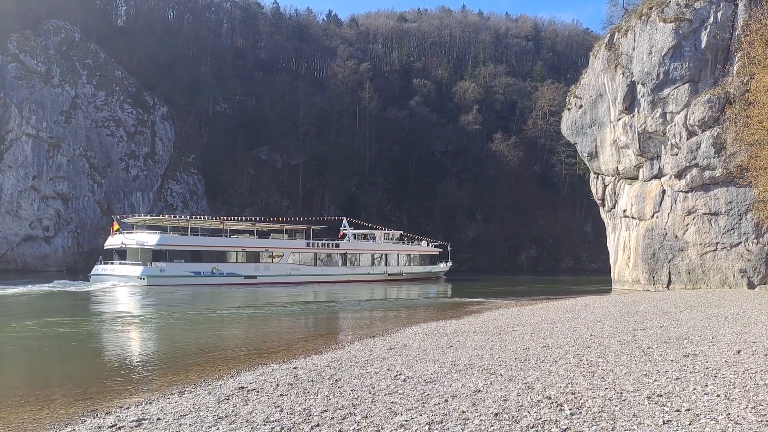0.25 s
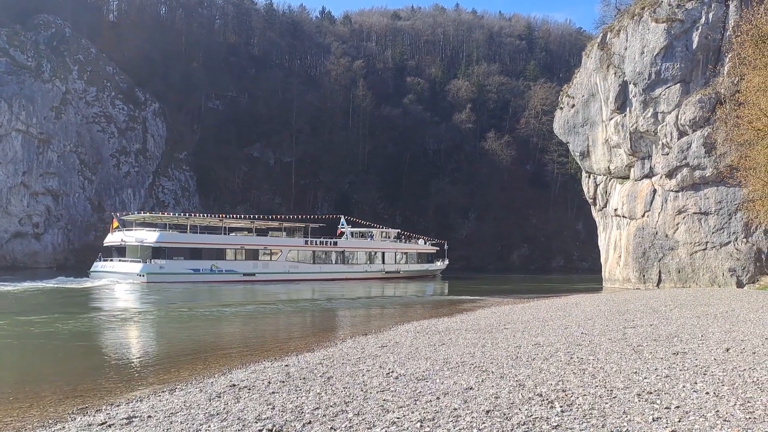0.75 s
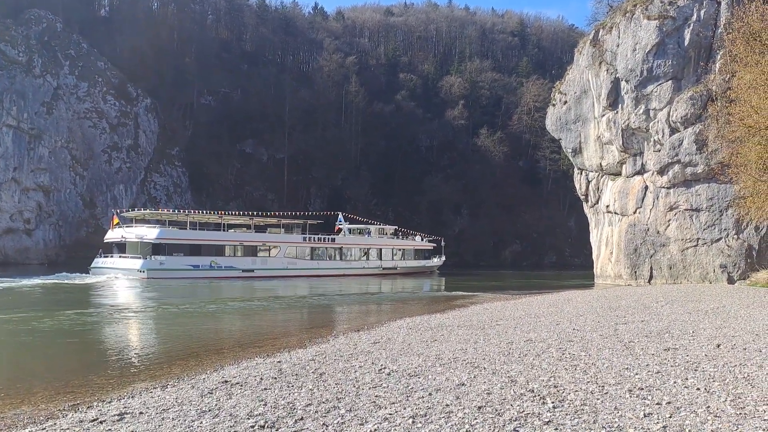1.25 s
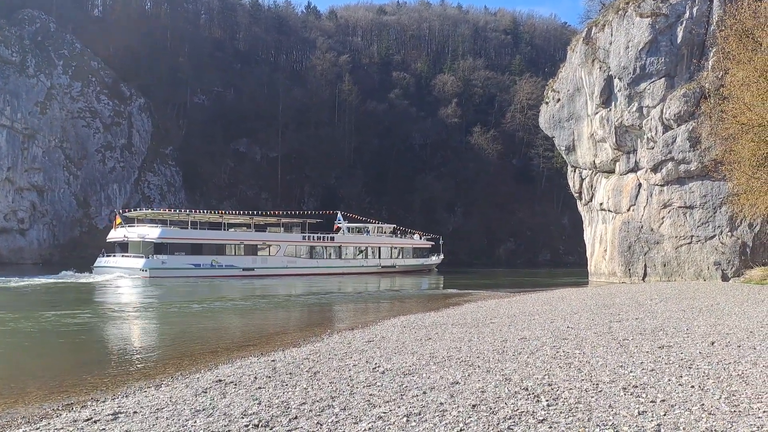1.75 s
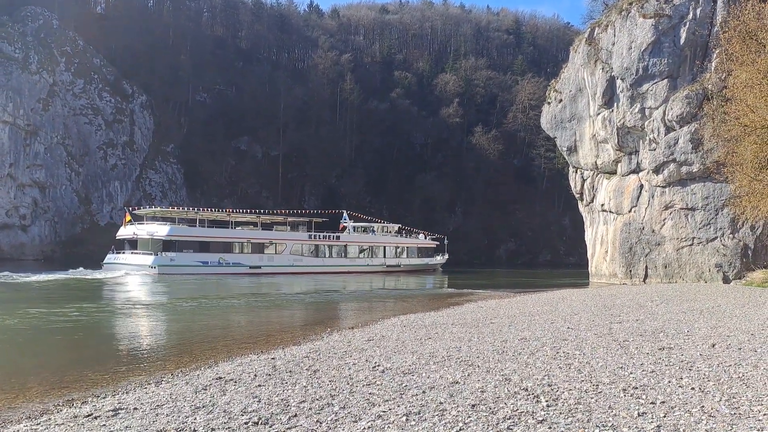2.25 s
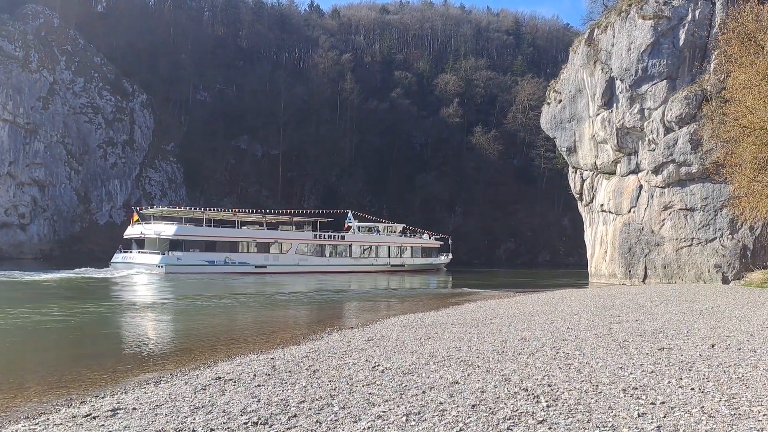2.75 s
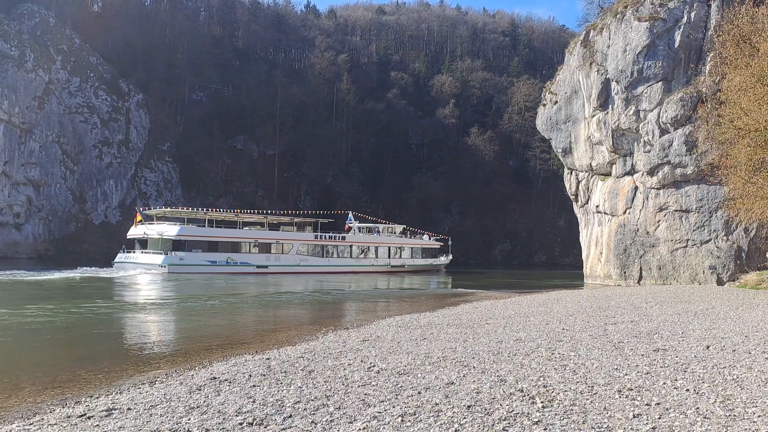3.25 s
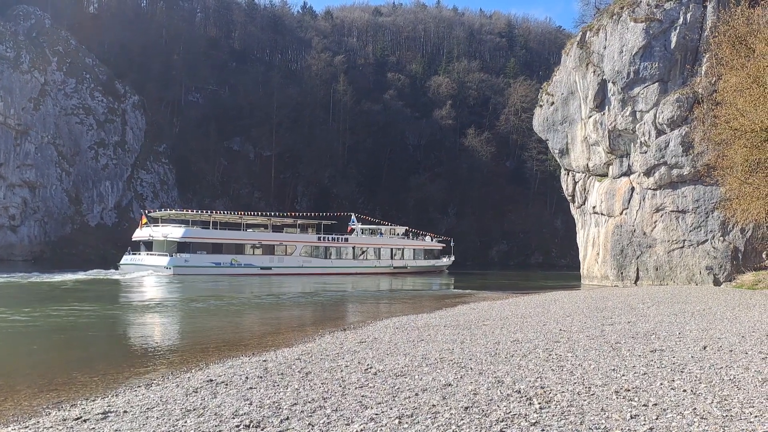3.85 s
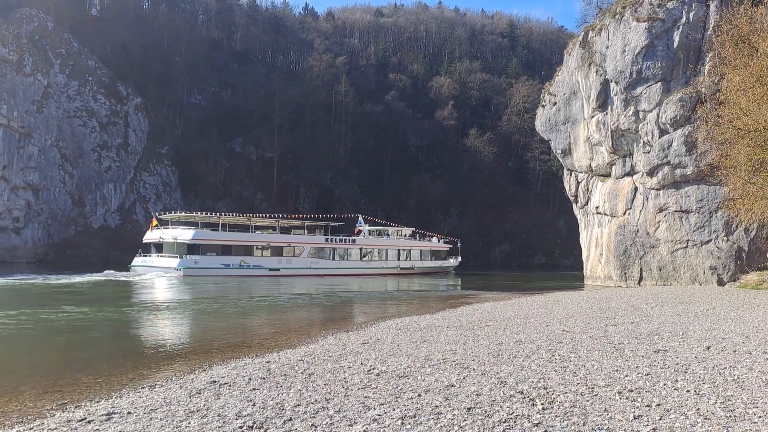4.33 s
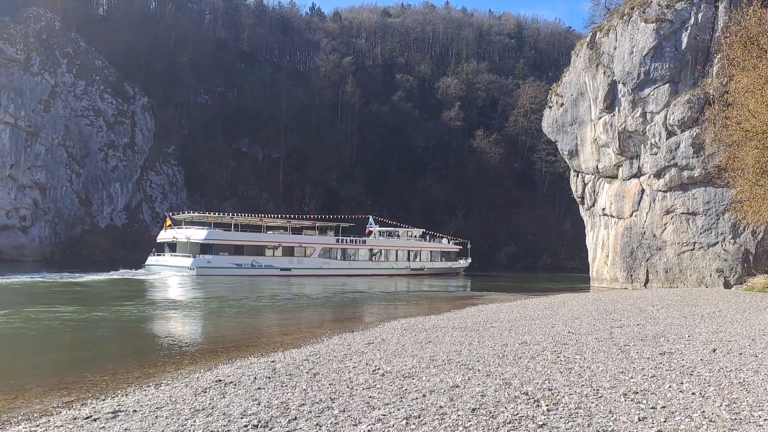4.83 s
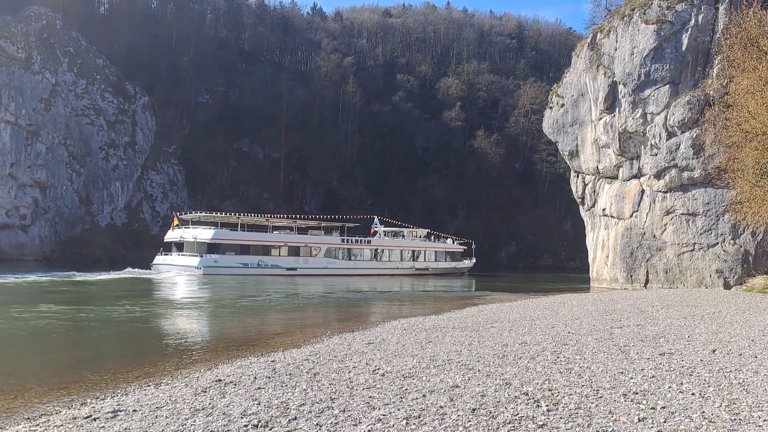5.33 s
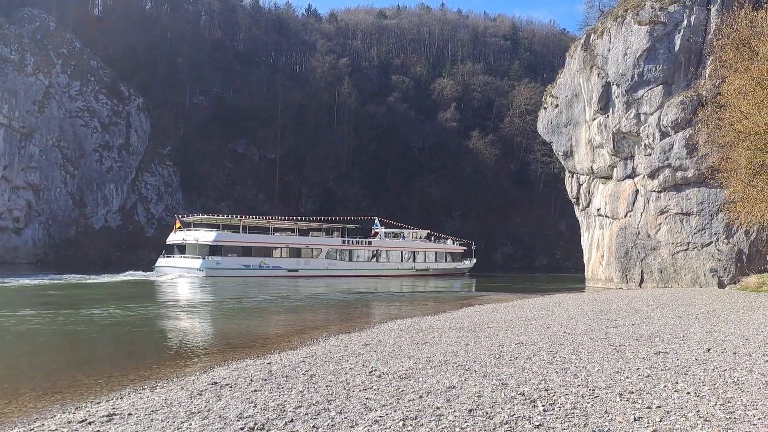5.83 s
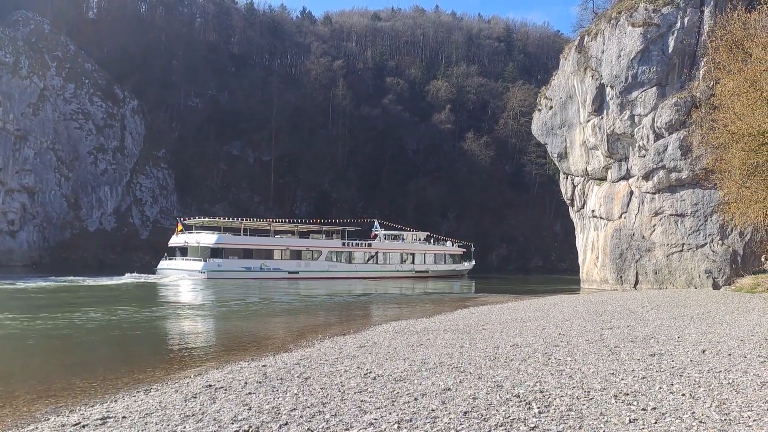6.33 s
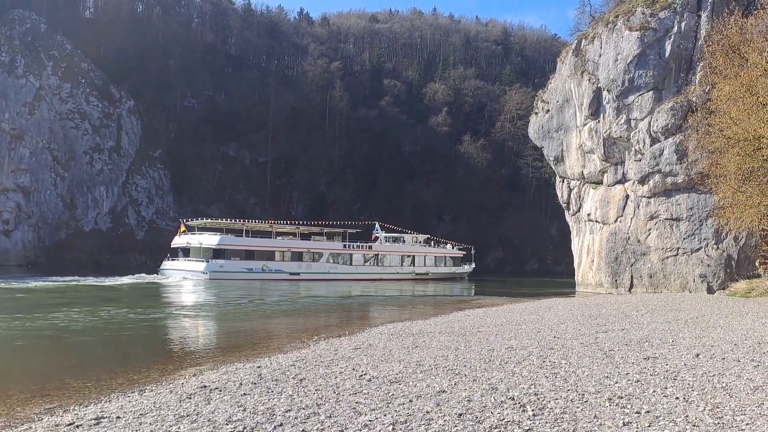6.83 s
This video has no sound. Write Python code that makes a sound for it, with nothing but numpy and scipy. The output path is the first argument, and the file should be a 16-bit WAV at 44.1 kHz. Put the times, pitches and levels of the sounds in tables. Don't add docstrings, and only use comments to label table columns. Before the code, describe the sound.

Outdoors on a gravel river bank in a gorge, a large passenger boat moves off with a deep, steady diesel throb that beats and swells, under a broad watery wash of wake and exhaust. Close by, wavelets hiss over pebbles with tiny ticks and drops, thickest in the first second. Small birds whistle thinly and buzz in the woods, echoing briefly, while light wind bumps the phone microphone.

```python
import sys
import numpy as np
from scipy import signal
from scipy.fft import rfft, irfft, next_fast_len
from scipy.io import wavfile
from scipy.ndimage import uniform_filter1d

SR = 44100
rng = np.random.default_rng(int(sys.argv[2]) if len(sys.argv) > 2 else 0)


def store_pcm(level_fs):
    pcm = np.round(np.clip(level_fs, -1, 1) * 32767).astype(np.int16)
    wavfile.write(sys.argv[1], SR, np.atleast_2d(pcm).T)


def field_ratio(decibels):
    return 10 ** (np.asarray(decibels, dtype=float) / 20)


N = 312159
TIME = np.arange(N) / SR
SIZE = next_fast_len(N)
HZ = np.arange(SIZE // 2 + 1) * SR / SIZE + 1e-9
PORT_LAG = 8


def curves(table):
    s, *columns = np.transpose(table)
    return [np.interp(TIME, s, c) for c in columns]


def over_hz(table):
    hz, value = np.transpose(table)
    return np.interp(np.log(HZ), np.log(hz), value)


def unit(x):
    return x / np.sqrt(np.mean(x ** 2))


def walk(rate):
    k = int(SR / rate)
    held = np.repeat(rng.standard_normal(N // k + 1), k)
    return unit(uniform_filter1d(uniform_filter1d(held, k), k)[:N])


def band(x, lo_hz, hi_hz):
    sos = signal.butter(2, [lo_hz, min(hi_hz, .45 * SR)], "band", fs=SR, output="sos")
    return signal.sosfilt(sos, x)


def pan(db):
    return field_ratio(np.array([db, -db]) / 2).reshape(2, -1)


def hump(length, power):
    count = int(length * SR)
    return np.sin(np.pi * np.arange(count) / count) ** power


def add(out, s, piece):
    i = int(s * SR)
    out[..., i:i + piece.shape[-1]] += piece[..., :N - i]


def tone(turns, db, wander):
    return np.sqrt(2) * field_ratio(db) * np.sin(2 * np.pi * turns + wander * walk(7.6))


# time in seconds, level in dB.
MAINS_LEVEL = [(0.0, -33.5), (0.5, -45), (1.0, -37), (1.5, -31.5), (2.0, -32.5), (2.5, -34), (3.0, -39),
               (3.5, -33), (4.0, -30), (4.5, -27.5), (5.0, -28), (5.5, -30.5), (6.0, -31), (6.5, -28),
               (7.0, -26.5)]
# time in seconds, rate in Hz.
MAINS_RATE = [(0, 55.5), (.7, 55.73), (3.0, 55.7), (3.5, 55.7), (4.0, 55.97), (4.9, 56.02), (5.5, 55.85),
              (7.08, 55.82)]
# pitch in Hz, turns made at the start.
UPPER_ORDERS = [(112.56, .49), (111.88, .32), (111.6, .81), (112.39, .35), (167.87, .94), (167.53, .54),
                (167.3, .85), (167.16, .78)]
UPPER_LEVELS = (-47, -54.5, -55, -59, -54.5, -54.5, -66, -59.5)


def mains():
    turns = .07 + np.cumsum(curves(MAINS_RATE)[0]) / SR
    out = tone(turns, curves(MAINS_LEVEL)[0] + 1, .05)
    for (hz, start), db in zip(UPPER_ORDERS, UPPER_LEVELS):
        out += tone(start + hz * TIME, db + walk(8.3), 0.095)
    return out


# time in seconds, level in dB.
GENERATOR_LEVEL = [(0, -32), (1, -30), (2, -31), (3, -32.5), (4, -31.5), (5, -34), (6, -32), (7.08, -31.5)]
# multiple of the firing rate, level against the firing line in dB.
GENERATOR_MULTIPLES = [(7 / 6, -19), (1.25, -26.5), (11 / 6, -27), (2, -28.5), (3, -28)]


def generator():
    turns = .2 + 75.025 * TIME
    db = curves(GENERATOR_LEVEL)[0] + .5 * walk(9)
    out = tone(turns, db, .05)
    for multiple, under_db in GENERATOR_MULTIPLES:
        out += tone(multiple * turns, db + under_db, 0.22)
    return out


# start in seconds, length in seconds, start pitch in Hz,
# end pitch in Hz, level in dB.
HULL_BOOMS = [
    (0.659, 0.22, 218, 235, -43.5),
    (2.853, 0.12, 239, 248, -51.5),
    (3.479, 0.11, 212.6, 225, -42),
    (3.979, 0.17, 212.5, 207, -43.5),
    (5.302, 0.12, 202, 253, -42),
    (5.407, 0.097, 270, 290, -44),
    (5.548, 0.14, 227.6, 223, -49),
    (6.051, .009, 630, 755, -40),
]


def hull():
    out = np.zeros(N)
    for s, length, start_hz, end_hz, db in HULL_BOOMS:
        shape = hump(length, 0.83)
        turns = np.cumsum(np.linspace(start_hz, end_hz, len(shape))) / SR
        add(out, s, field_ratio(db) * np.sqrt(2) * shape * np.sin(2 * np.pi * turns))
    return out


def engines():
    out = mains() + generator() + hull()
    return np.array([out, np.pad(out, (PORT_LAG, 0), "edge")[:N]])


# frequency in Hz, left minus right in dB.
PORT_BALANCE = [(60, -16.5), (110, 2), (200, -1), (380, 0.5), (700, -0.5), (1290, -0.5), (2380, -3.5),
                (4400, 1.5), (8120, 7), (15000, 10.5)]


def rush(colour, alike, lead, flicker_db, rate):
    shared, left, right = rfft(rng.standard_normal((3, SIZE)))
    alike = np.clip(alike, 0, 1)
    pair = np.sqrt(alike) * np.array([shared, shared * np.exp(-1j * lead)])
    pair = pair + np.sqrt(1 - alike) * np.array([left, right])
    pair = pair * field_ratio(over_hz(colour)) * pan(over_hz(PORT_BALANCE))
    centres = 62.5 * 2. ** np.arange(9)
    place = np.log2(np.clip(HZ, centres[0], centres[-1]))
    out = np.zeros((2, N))
    for c in centres:
        if colour[0][0] / 2 < c < colour[-1][0] * 2:
            octave = np.clip(1 - abs(place - np.log2(c)), 0, 1)
            out += field_ratio(flicker_db * walk(rate)) * irfft(pair * octave, SIZE)[:, :N]
    return unit(out)


def bubbles(rate, cycles):
    out = np.zeros((2, N))
    for hz in 420 * 1.17 ** np.arange(12):
        pushes = (rng.random(N) < rate / SR) * field_ratio(4.4 * np.minimum(rng.exponential(size=N), 3.0))
        pushes = uniform_filter1d(pushes, size=int(SR / hz / 2))
        pole = np.exp(-hz / cycles / SR)
        ring = signal.lfilter([1], [1, -2 * pole * np.cos(2 * np.pi * hz / SR), pole ** 2], pushes)
        out += pan(3.1 * rng.standard_normal()) * unit(ring) * (600 / hz) ** 0.26
    return unit(np.array([out[0], np.pad(out[1], (PORT_LAG, 0))[:N]]))


# start in seconds, length in seconds, rise in dB.
RUN_UPS = [(0, 0.33, 1.5), (0.54, 0.57, 7), (0.899, 0.6, 3), (1.49, 0.27, 3), (2.42, .25, 1),
           (2.62, 0.26, 2), (3.41, 0.25, 3.5), (4.6, 0.58, 5.5), (4.978, 0.86, 6.5), (5.947, 0.13, 4.5),
           (6.4, .8, 3.5)]


def surge():
    out = np.zeros(N)
    for s, length, rise_db in RUN_UPS:
        progress = np.linspace(0, 1, int(length * SR)) ** 0.72
        add(out, s, rise_db * np.sin(np.pi * progress))
    return out


# frequency in Hz, level in dB
# per Hz.
WAKE_COLOUR = [(30, -13.5), (60, -3.5), (110, -3.5), (180, -5.5), (320, -10), (600, -8), (780, -11.5),
               (1000, -12.3), (1400, -14.5), (2000, -20.5), (2800, -22.5), (3700, -31), (5000, -33.5),
               (6100, -38.5), (7500, -39.5), (9500, -53)]
# frequency in Hz, likeness from 0 to 1.
WAKE_ALIKE = [(100, 0.97), (300, 0.94), (700, 0.82), (1200, 0.62), (2000, 0.64), (2800, 0.71), (3300, 0.6),
              (6000, 0.2), (7500, 0.96)]
# frequency in Hz, lead in radians.
WASH_LEAD = [(50, 0.045), (300, 0.065), (1000, 0.55), (1640, 1.68), (1900, 1.07), (2400, 1.9), (3200, 4.2),
             (3800, 4.92), (4600, 4.76), (5400, 5.7), (6000, 8.8), (7000, 11.7), (7600, 13.9)]
# frequency in Hz, level in dB per Hz.
SPRAY_SPECTRUM = [(1700, -27), (2200, -7), (2900, 3.5), (3400, 4.5), (3900, -0.5), (4400, -10), (5500, -54)]


def wash():
    lead = over_hz(WASH_LEAD)
    wake = rush(WAKE_COLOUR, over_hz(WAKE_ALIKE), lead, 1.3, 15)
    gurgle = field_ratio(-11) * bubbles(rate=18, cycles=9)
    wake_db = -41.5 + 4.0 - 0.226 * TIME + 0.14 * walk(7.5)
    spray_db = -53.5 - 1.83 * TIME + .72 * surge()
    spray = rush(SPRAY_SPECTRUM, 0.78, lead, 2.0, 12)
    return field_ratio(wake_db) * (wake + gurgle) + field_ratio(spray_db) * spray


CRACKLE_PITCHES = (6500, 8500, 10500, 12500, 14300)


def crackle(level):
    burst = rng.random(N) < 420 / SR * level / np.median(level)
    strength = field_ratio(2.8 * np.minimum(rng.exponential(size=N), 3))
    sparks = burst * strength * rng.choice([-1, 1], N)
    sides = pan(5 + 4 * rng.standard_normal(N))
    size = rng.integers(len(CRACKLE_PITCHES), size=N)
    out = np.zeros((2, N))
    for k, hz in enumerate(CRACKLE_PITCHES):
        out += band(sparks * sides * (size == k), hz * .88, hz * 1.12) * np.sqrt(9000 / hz)
    return unit(out)


# frequency in Hz, level in dB per Hz.
SEETHE_SPECTRUM = [(4500, -22), (6000, -6.5), (7500, 1), (9000, -3.5), (11000, -5.5), (13800, -8),
                   (15600, -19)]
# frequency in Hz, likeness from 0 to 1.
SEETHE_LIKENESS = [(6000, 0.4), (7500, 0.7), (10000, 1), (11500, 0.4), (13500, 0.6), (14500, .9)]
# time in seconds, side gain in dB.
BANK_SPREAD = [(0, -2), (.5, 0), (1, 1), (1.6, -3), (1.75, -7), (2.4, -4), (2.55, 3), (3.1, 0), (3.7, 1.5),
               (3.9, -3), (4.35, -5), (4.5, 3), (4.8, 4), (5.5, 1), (5.95, -2), (6.3, -6), (6.5, 1.5),
               (7.08, 0)]


def seethe():
    level = field_ratio(-68 - 0.74 * TIME + surge() + 1.2 * walk(14))
    hiss = rush(SEETHE_SPECTRUM, over_hz(SEETHE_LIKENESS), 0, 1.5, 25)
    left, right = level * (field_ratio(3.0) * hiss + field_ratio(-3) * crackle(level))
    mid = (left + right) / 2
    side = (left - right) / 2 * field_ratio(curves(BANK_SPREAD)[0])
    return np.array([mid + side, mid - side])


# time in seconds, peak in dB, pitch in Hz, left minus right in dB.
PEBBLE_TICKS = [(0.0498, -43, 13900, 3.0), (0.532, -50, 11900, 10), (0.5586, -45, 13300, 9),
                (0.615, -46, 10000, 3.5), (0.6739, -40, 11700, 8), (.7607, -46, 13800, 4),
                (0.8145, -45, 11400, 3.0), (0.855, -41, 11500, 8), (.9428, -46, 12900, 3),
                (1.1079, -49, 11500, 3.5), (2.3261, -53, 9950, 2.0), (2.5446, -45, 12200, 13),
                (2.5915, -45, 13800, 11), (2.8594, -50, 9440, 4.0), (2.9566, -48, 10900, 13),
                (3.3423, -53, 9960, 2.0), (3.485, -44, 8960, 8), (3.6576, -49, 13400, 9),
                (4.2093, -53, 11300, 2.0), (4.4608, -53, 11000, 11), (4.6019, -45, 9460, 10),
                (4.775, -48, 12400, 16), (5.0389, -52, 9870, 9.0), (5.5388, -50, 13500, 10),
                (5.9703, -49, 9800, 0.5), (6.1155, -49, 10300, 5), (6.138, -50, 11900, 8),
                (6.3804, -51, 9710, 5.0), (6.4622, -44, 15400, 10), (6.76, -49, 11000, 7)]


def pebbles():
    out = np.zeros((2, N))
    t = TIME[:int(.006 * SR)]
    for s, db, hz, pan_db in PEBBLE_TICKS:
        noise = rng.standard_normal(len(t))
        knock = .9 * band(noise, hz * .72, min(hz * 1.3, 15700))
        ring = np.exp(-t / .0007) * (.5 * np.sin(2 * np.pi * hz * t) + knock)
        body_db = -3 - 17 * np.log2(hz / 11000) + 4
        body = field_ratio(body_db) * np.exp(-t / .0009) * band(band(noise, 6600, 9300), 6600, 9300)
        add(out, s, field_ratio(db + 4.0) * pan(pan_db) * (ring + body))
    return out


def pings(table, cycles, gain_db):
    out = np.zeros((2, N))
    t = TIME[:int(.006 * SR)]
    for s, db, hz, pan_db in table:
        ring = np.exp(-t * hz / cycles) * np.sin(2 * np.pi * hz * t)
        add(out, s, field_ratio(db + gain_db) * pan(pan_db) * ring)
    return out


# time in seconds, peak in dB, #
# pitch in Hz, left minus right in dB.
RINGING_DROPS = [(0.6264, -47, 6840, 0.5), (0.7034, -46, 6050, 2.5), (0.7124, -43, 6700, 1.5),
                 (0.7264, -46, 6590, 2.0), (0.7514, -50, 8080, 0.5), (0.7622, -46, 8030, 2.0),
                 (0.815, -45, 8030, 1.5), (0.838, -44, 9290, 2.5), (0.8839, -45, 6420, 3.5),
                 (0.9004, -48, 7920, 2.0), (0.9742, -45, 8090, 2.0), (1.2104, -52, 7190, 3.0),
                 (2.1974, -44, 6900, 2.5), (4.6463, -54, 7460, 3.0), (5.0494, -51, 6970, 3.0),
                 (5.0674, -48, 7050, 3.0), (6.6114, -53, 6900, 5.5), (6.7034, -50, 7100, 4.0),
                 (6.8982, -52, 7300, 4.0), (6.9964, -57, 6940, 6.0),
                 (0.5851, -55, 10100, 5.0), (0.6913, -48, 10400, 3.0), (0.7208, -47, 11400, 3.5),
             (0.8294, -43, 11300, 4.5), (1.071, -50, 11300, 3.5), (1.1533, -53, 9780, 6.5),
             (2.2633, -59, 10100, 0.5), (2.3895, -57, 12100, 6.5), (2.6843, -50, 10200, 5.7),
             (3.2869, -55, 10800, 7.0), (3.4924, -51, 9800, 3.5), (3.6925, -48, 10000, 6.5),
             (4.1624, -57, 10100, 1.5), (4.8389, -56, 9700, 9.5), (4.8994, -51, 10700, 8.5),
             (4.9187, -55, 9870, 7.0), (5.0574, -50, 10300, 10.5), (5.1417, -54, 12400, 10.5),
             (5.5974, -57, 9720, 5.0), (6.7126, -53, 10600, 3.0), (6.9092, -55, 10800, 3.5),
                 (0.0328, -52, 13800, 3.0), (0.5197, -53, 14100, 4.0), (0.7243, -50, 13400, 3.5),
              (0.8884, -50, 12900, 2.5), (0.9617, -51, 13000, 2.0), (0.9921, -45, 13000, 4.0),
              (1.3982, -57.5, 13800, 0.5), (2.0502, -56, 13000, 6.0), (2.1959, -60, 12500, 2.0),
              (2.4179, -58, 14400, 1.0), (2.8963, -56, 13000, 8.5), (3.4146, -57, 13600, 3.0),
              (3.465, -50, 13600, 6.0), (5.1417, -56, 12600, 7.5), (5.6251, -57, 15100, 2.5),
              (5.6685, -57, 13500, 5.5), (5.8885, -58, 13700, 4.5), (6.4936, -58, 12800, 4.5),
              (6.6233, -54, 13500, 1.0), (6.775, -54, 13200, 6.0), (7.0209, -55, 13200, 3.0)]
# time in seconds, peak in dB, pitch in Hz, left minus right in dB.
GRIT_CLICKS = [(0.5624, -47, 8610, 3.5), (0.614, -42, 10000, 3.5), (0.7894, -45, 8650, 3.0),
               (0.7994, -42, 10900, 3.5), (0.8504, -39, 11600, 3.5), (0.9044, -50, 9610, 2.0),
               (3.4146, -50, 8620, 2.0), (3.4585, -50, 8650, 5.5), (3.5974, -54, 8510, 2.0),
               (3.8874, -55, 8520, 0.5), (3.9324, -57, 8550, 1.0), (4.0053, -53, 9170, 2.5),
               (4.4674, -51, 9460, 8.5), (4.4864, -55, 10400, 7.5), (4.4924, -56, 11100, 4.0),
               (4.5184, -52, 9260, 4.0), (4.8844, -46, 9220, 8.0), (5.0389, -48, 8650, 8.5),
               (5.0514, -47, 11300, 8.5), (5.0724, -49, 8620, 6.0), (5.1484, -54, 8520, 7.5)]


def shore():
    drops = pings(RINGING_DROPS, cycles=7, gain_db=1.5)
    grit = pings(GRIT_CLICKS, cycles=2.5, gain_db=2)
    return seethe() + pebbles() + drops + grit


def whistle(out, call, halfway, tremble, turn, warble, lag):
    s, length, start_hz, end_hz, db = call
    shape = hump(length, .35)
    heard = slice(int(s * SR), int(s * SR) + len(shape))
    mid_hz = start_hz + (end_hz - start_hz) * halfway
    bend = np.polyfit([0, .5, 1], [start_hz, mid_hz, end_hz], deg=2)
    glide = np.polyval(bend, np.linspace(0, 1, len(shape))) * warble[heard]
    turns = (np.cumsum(glide) - np.array([[0], [lag]]) * glide) / SR
    level = field_ratio(db + 1.5) * np.sqrt(2) * pan(-0.47) * shape * unit(tremble[heard]) * turn[heard]
    add(out, s, level * np.sin(2 * np.pi * turns))


# start in seconds, length in seconds, start pitch in Hz,
# end pitch in Hz, level in dB, share of the glide done by mid-call.
THIN_CALLS = [
    (1.203, 0.42, 8500, 7260, -67, .6),
    (1.468, 0.34, 9300, 7800, -64.5, 0.72),
    (3.501, 0.19, 8770, 8000, -63, .6),
    (4.947, 0.25, 9200, 7850, -67.5, .6),
    (6.63, 0.23, 9030, 8080, -66, 0.6),
]
# start in seconds, length in seconds, gain in dB.
CALL_ACCENTS = [(1.23, .07, 1), (1.46, .15, -2), (1.47, .05, -4), (1.54, .075, 4), (1.612, .035, -14),
                (1.668, .045, 6), (1.715, .03, -6), (3.5, .07, 2), (3.575, .04, -3), (4.96, .1, 2),
                (5.07, .04, -4), (5.11, .05, 3), (6.63, .02, -5), (6.71, .07, -4), (6.785, .03, 4),
                (6.83, .022, -8)]
# start in seconds, length in seconds, start pitch in Hz,
# end pitch in Hz, level in dB.
SONG_NOTES = [(4.09, .024, 3940, 3400, -55.5), (4.11, .018, 3530, 3800, -58), (4.15, .035, 4250, 4320, -67),
              (4.199, 0.028, 4230, 4320, -61), (4.238, .03, 4250, 4300, -66),
              (4.274, 0.048, 6460, 6400, -63.5), (4.38, 0.013, 6300, 5450, -59),
              (4.386, 0.024, 5400, 5300, -55.5), (4.405, 0.018, 5450, 5300, -63),
              (4.44, 0.06, 5360, 5340, -70), (4.463, 0.016, 4430, 4000, -59),
              (4.476, 0.019, 3980, 3930, -55.5), (4.575, 0.045, 3900, 3850, -67),
              (4.345, 0.03, 6350, 6300, -69), (4.514, 0.031, 3920, 3220, -51),
              (4.838, 0.0054, 2900, 2500, -47.5), (4.884, .022, 5750, 4550, -61),
              (4.903, .015, 4450, 4420, -58), (4.952, .03, 4420, 4000, -62),
              (5.174, 0.042, 3330, 3310, -59), (5.228, .028, 3310, 3310, -62),
              (5.365, .03, 3960, 3970, -65), (5.256, 0.023, 3960, 3950, -54.5),
              (5.405, .025, 3060, 2930, -62), (5.428, .042, 2900, 2970, -58), (5.7, .06, 4350, 4500, -68),
              (5.584, .045, 4000, 4300, -62), (5.628, .042, 4380, 4330, -58.5),
              (5.95, .022, 4480, 4400, -60), (5.975, 0.032, 4280, 3670, -61),
              (6.647, 0.024, 4970, 3780, -54.5), (6.792, .014, 3700, 5000, -63),
              (6.822, 0.034, 4270, 3780, -53.5)]


def whistles(flutter):
    out = np.zeros((2, N))
    warble = 1 + .008 * walk(170)
    shimmer = field_ratio(3.8 * np.tanh(walk(110)))
    turn_db = np.zeros(N)
    for s, length, db in CALL_ACCENTS:
        add(turn_db, s, db * hump(length, .5))
    for *call, halfway in THIN_CALLS:
        whistle(out, call, halfway, shimmer, field_ratio(turn_db), warble ** .5, lag=1)
    for note in SONG_NOTES:
        whistle(out, note, 0.784, flutter ** .7, np.ones(N), warble, lag=1.7)
    return out


# start in seconds, #
# length in seconds, pitch in Hz, width in Hz, level in dB.
ROUGH_SOUNDS = [(0.56, 0.14, 6860, 900, -62), (.66, .28, 13900, 800, -71), (.62, .44, 16000, 4500, -69),
                (0.625, 0.24, 2410, 700, -55), (1.558, 0.073, 7220, 550, -56.5),
                (1.638, 0.11, 7100, 500, -68), (2.443, .028, 7250, 400, -58), (2.49, .04, 7300, 400, -55),
                (2.538, .016, 7300, 400, -58), (2.48, .038, 4450, 200, -60), (2.523, .025, 4430, 200, -59),
                (2.55, .03, 4400, 200, -63), (2.44, 0.11, 8500, 3600, -57.5), (2.45, .11, 12000, 4000, -66),
                (3.35, 0.13, 7800, 500, -62.5), (3.45, .04, 9300, 400, -67), (3.745, .045, 8000, 350, -64),
                (3.09, .06, 7300, 600, -70), (3.55, .07, 8200, 350, -61), (3.679, 0.067, 7830, 500, -55.5),
                (3.805, .065, 7800, 450, -57), (3.84, 0.058, 8200, 400, -64), (3.92, 0.078, 8000, 450, -65),
                (3.4, 0.14, 7600, 900, -68), (5.22, 0.26, 13400, 700, -70), (.56, 0.17, 3670, 500, -61),
                (.8, 0.22, 3600, 600, -59.5), (1.01, .2, 3550, 500, -62.5), (4.5, 0.64, 2300, 900, -62.5),
                (5.18, 0.76, 2100, 900, -60.5), (3.98, .1, 7900, 1100, -68), (1.575, .04, 8950, 250, -68)]


def buzzes(flutter):
    out, noise = np.zeros((2, N)), rng.standard_normal(N)
    for s, length, hz, width_hz, db in ROUGH_SOUNDS:
        shape = hump(length, 0.45)
        heard = slice(int(s * SR), int(s * SR) + len(shape))
        buzz = unit(band(noise[heard], hz - width_hz / 2, hz + width_hz / 2) * flutter[heard])
        add(out, s, field_ratio(db) * pan(5.5) * shape * buzz)
    return out


def gorge(calls):
    t60_s, tail_db = .4, -5.5
    t = TIME[:SR // 2]
    scatter = rng.standard_normal(len(t)) + .8 * rng.standard_normal((2, len(t)))
    tail = scatter * field_ratio(-60 * t / t60_s) * (t > .004)
    tail = tail / np.linalg.norm(tail[0])
    return field_ratio(tail_db) * signal.fftconvolve(calls, tail, axes=1)[:, :N]


def birds():
    flutter = field_ratio(5 * np.tanh(walk(150)) + 1.5 * walk(45))
    calls = whistles(flutter) + buzzes(flutter)
    return calls + gorge(calls)


# time in seconds, level in dB.
BREEZE_LEVEL = [(0.0, -55), (0.4, -54), (0.6, -47.5), (1.1, -49), (1.7, -53.5), (2.3, -54), (2.9, -54),
                (3.4, -61), (3.7, -51.5), (4.3, -68), (4.9, -64), (5.15, -44), (5.45, -55.5), (5.8, -49),
                (6.15, -47.5), (6.4, -52), (6.75, -45), (7.08, -44.5)]


def breeze():
    puffs = np.tanh(2.0 * np.array([walk(25), walk(25)]))
    low, high = rng.standard_normal((2, 2, N))
    thud = unit(field_ratio(4.4 * puffs) * band(low, 39, 81))
    flap = unit(field_ratio(11 * puffs) * band(high, 100, 240))
    level = field_ratio(curves(BREEZE_LEVEL)[0])
    return field_ratio(10.0) * level * thud + field_ratio(46) * level ** 2 * flap


def scene():
    return engines() + wash() + shore() + birds() + breeze()


# time in seconds, left gain in dB,
# right gain in dB, length in seconds.
BASS_DIPS = [(0.2, -25, -3, 0.06), (0.364, -0.8, -2.5, 0.03), (0.634, -17, -15, 0.022),
             (0.843, -6, -23, 0.03), (0.94, -2, -3.5, 0.079), (1.095, -1, -1.5, 0.064),
             (1.587, -1.5, 0, 0.063), (2.176, -0.5, -0.5, 0.2), (2.363, -3, -2.5, 0.061),
             (3.09, -3, -1.5, 0.03), (3.292, 0, -3, 0.067), (4.932, 0, -0.5, 0.07), (5.117, -1.5, -2, .02),
             (5.161, -4.5, -3.5, 0.052), (5.218, -3, -4, 0.029), (5.275, -2.5, -10, 0.024),
             (5.724, -3, -2, 0.043), (6.388, -1.5, -1, 0.045), (7.022, -2.5, -1.5, 0.05)]


def wind_guard(dry):
    bass = signal.sosfiltfilt(signal.butter(2, 130, fs=SR, output="sos"), dry)
    dip_db = -field_ratio(curves(BREEZE_LEVEL)[0] + 45.5) * np.array([walk(45), walk(45)]) ** 2
    for s, left_db, right_db, length in BASS_DIPS:
        dip = 3.4 * np.array([[left_db], [right_db]]) * hump(2 * length, 3.3)
        add(dip_db, s - length, dip)
    return dry + bass * (field_ratio(dip_db) - 1)


def band_limit(x):
    return signal.sosfilt(signal.butter(12, 15830, fs=SR, output="sos"), x)


def record(dry):
    top_cut = signal.ellip(8, .1, 40, 15750, fs=SR, output="sos")
    heard = signal.sosfiltfilt(top_cut, wind_guard(dry))
    fade = np.clip((TIME[-1] - TIME) / .003, 0, 1)
    return band_limit(heard * fade)


dry = scene()
out = record(dry)
store_pcm(out)
```